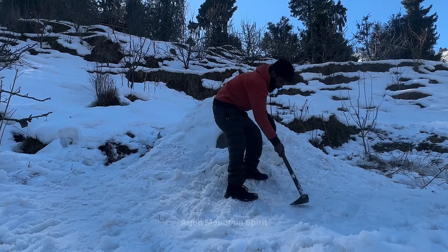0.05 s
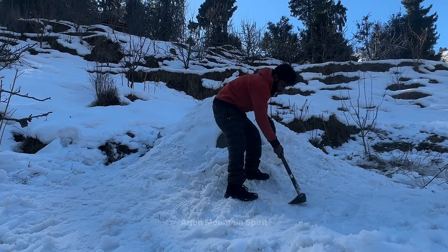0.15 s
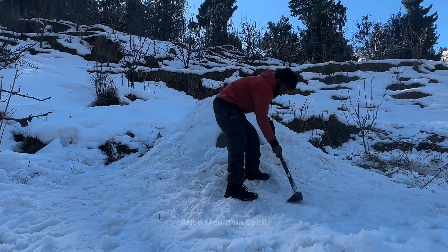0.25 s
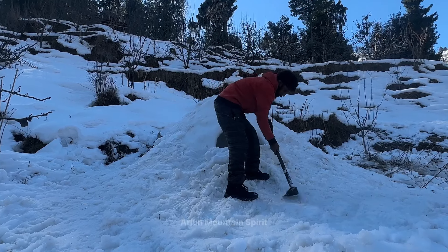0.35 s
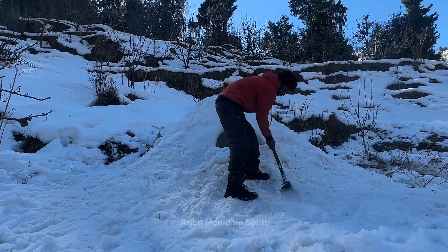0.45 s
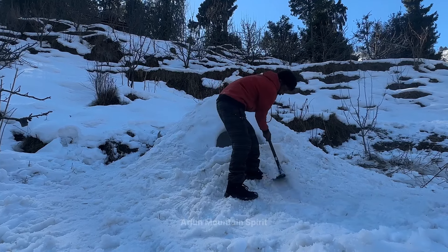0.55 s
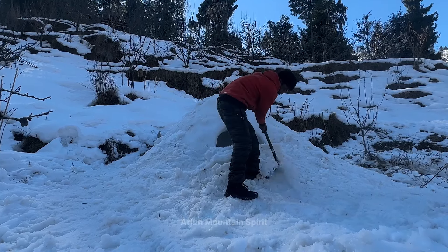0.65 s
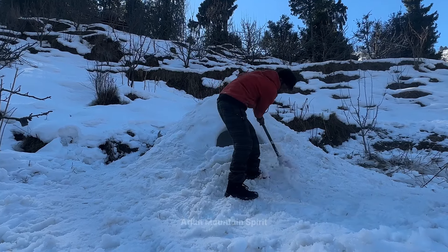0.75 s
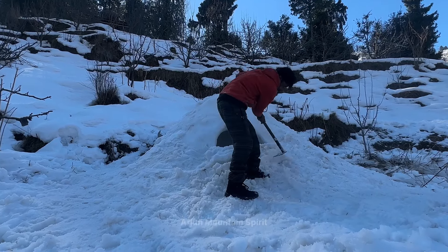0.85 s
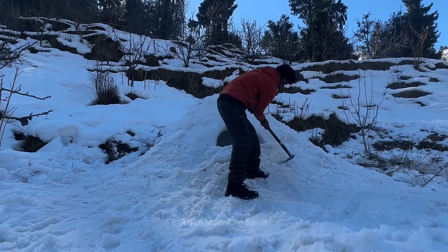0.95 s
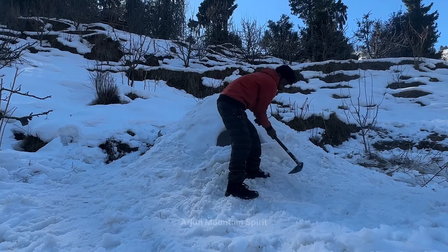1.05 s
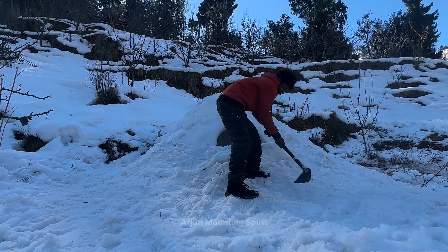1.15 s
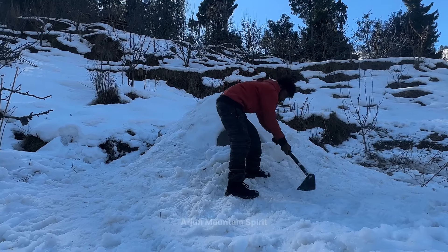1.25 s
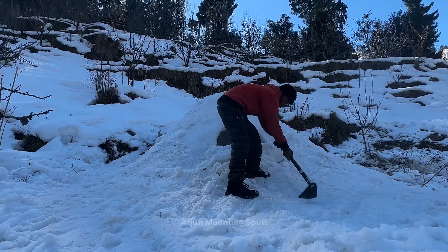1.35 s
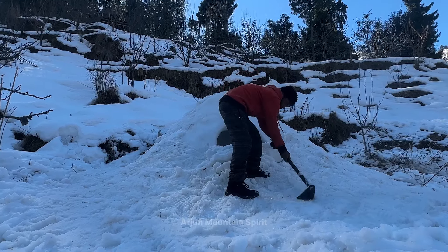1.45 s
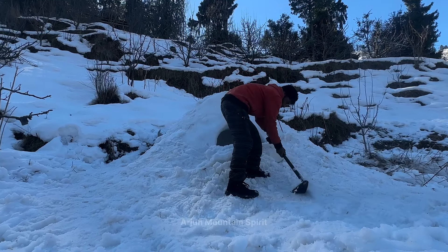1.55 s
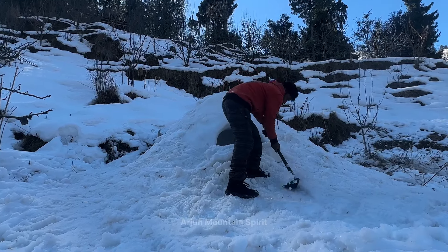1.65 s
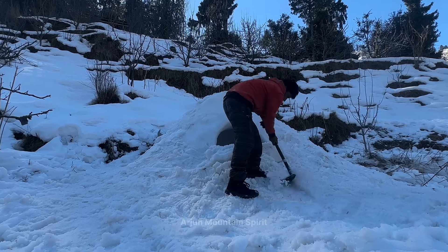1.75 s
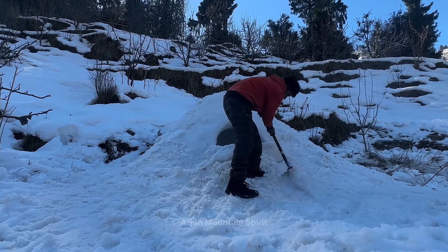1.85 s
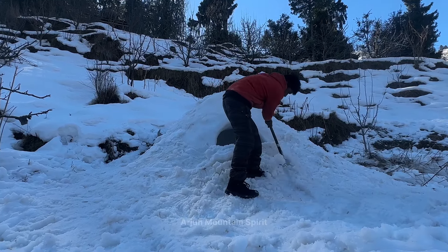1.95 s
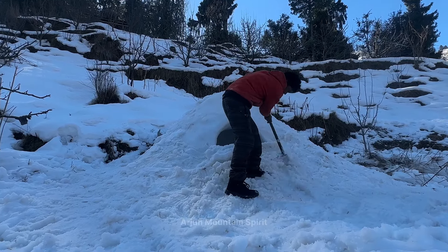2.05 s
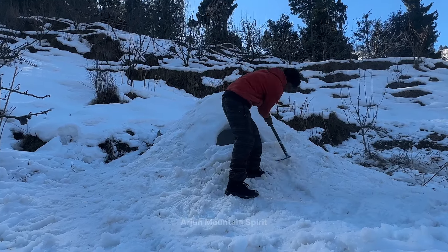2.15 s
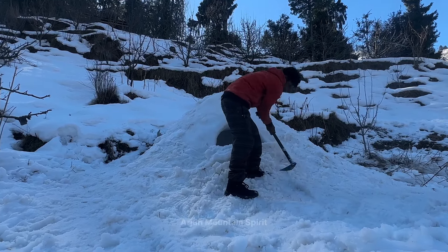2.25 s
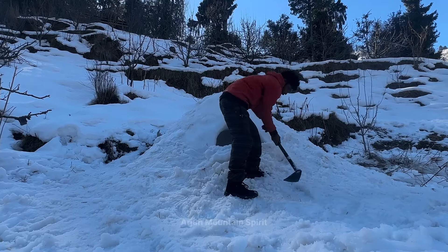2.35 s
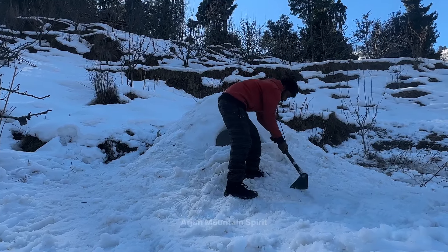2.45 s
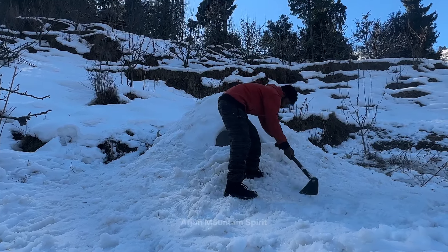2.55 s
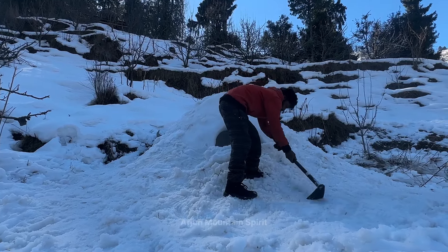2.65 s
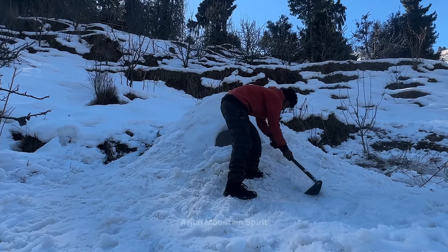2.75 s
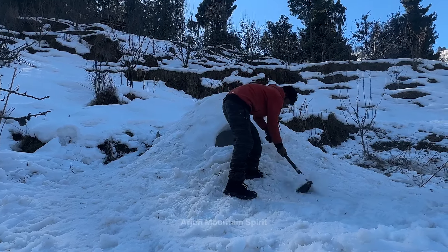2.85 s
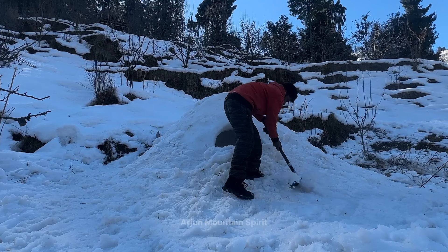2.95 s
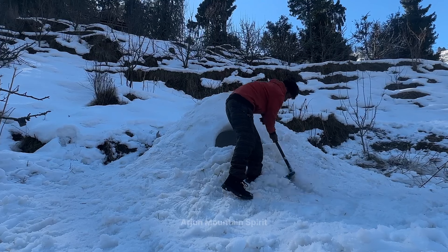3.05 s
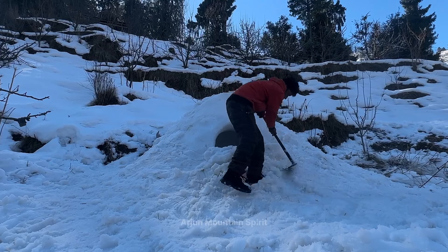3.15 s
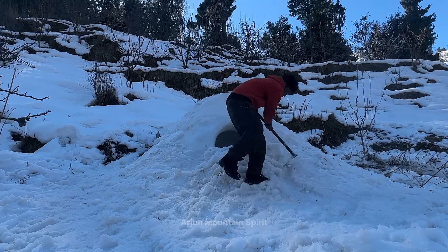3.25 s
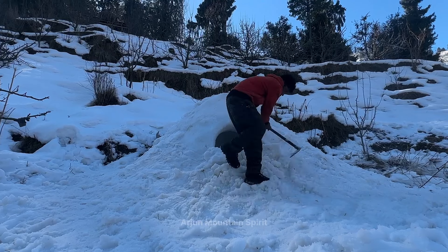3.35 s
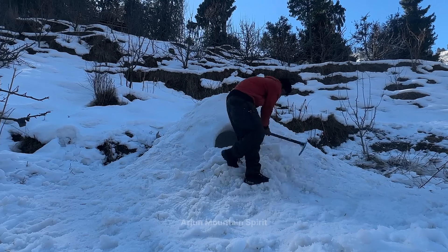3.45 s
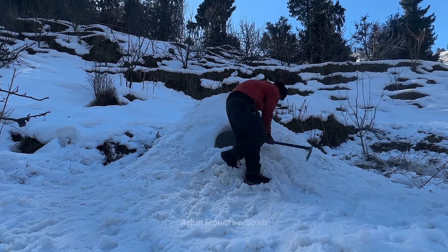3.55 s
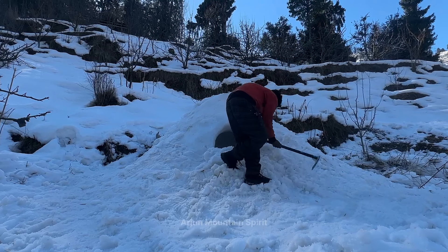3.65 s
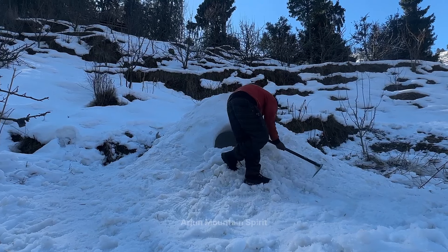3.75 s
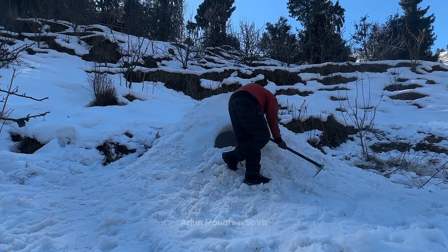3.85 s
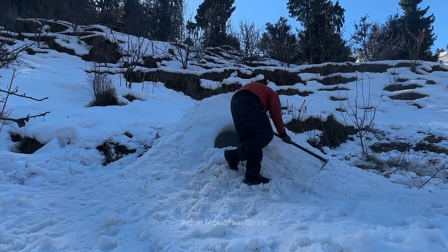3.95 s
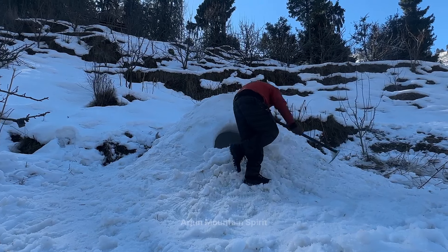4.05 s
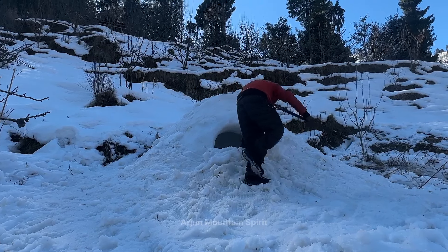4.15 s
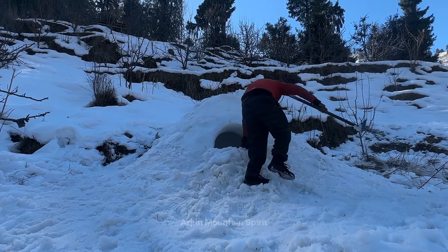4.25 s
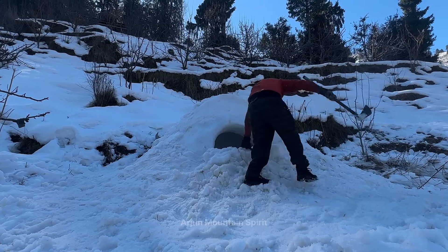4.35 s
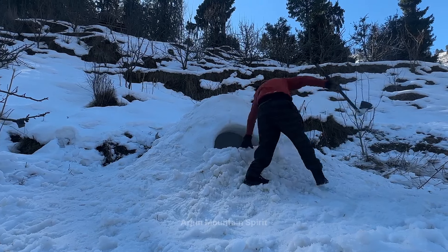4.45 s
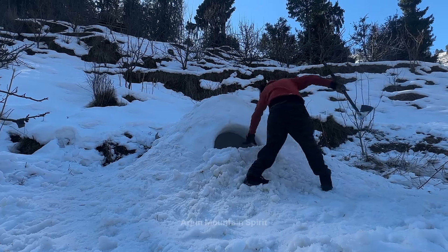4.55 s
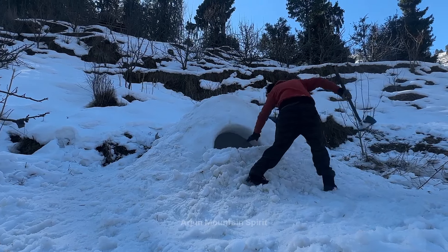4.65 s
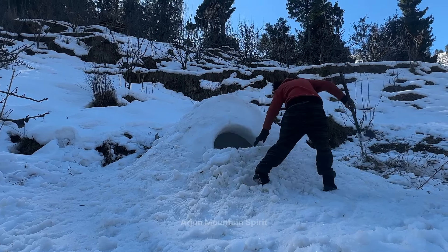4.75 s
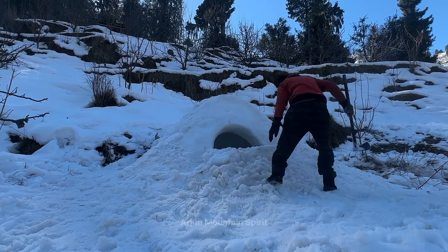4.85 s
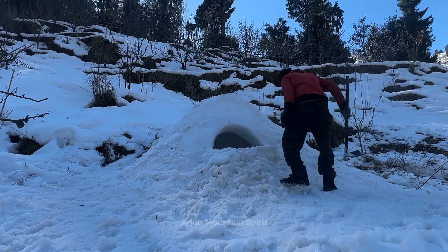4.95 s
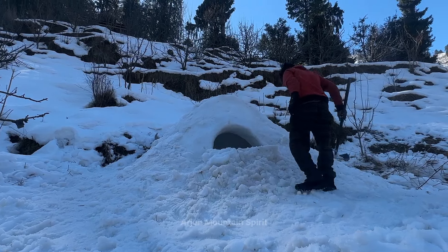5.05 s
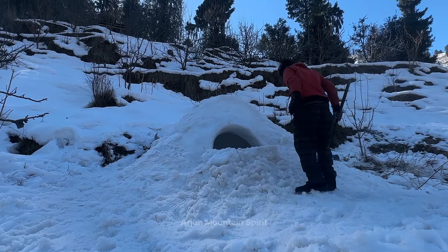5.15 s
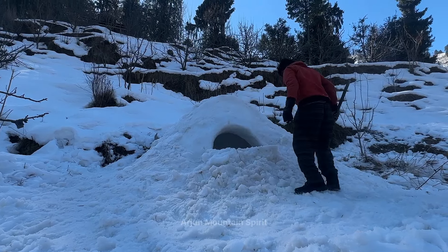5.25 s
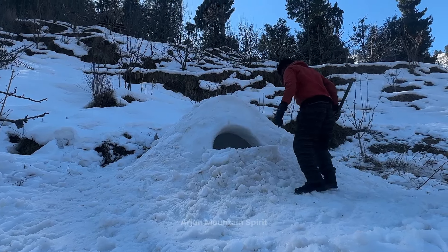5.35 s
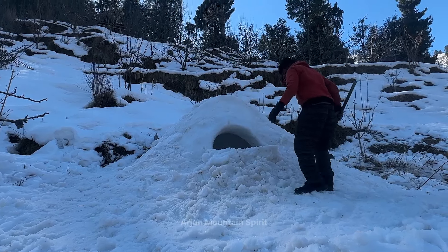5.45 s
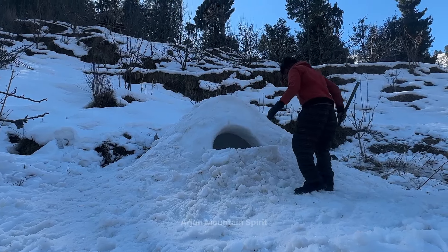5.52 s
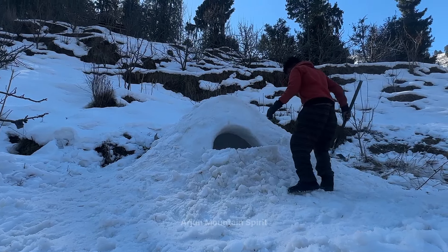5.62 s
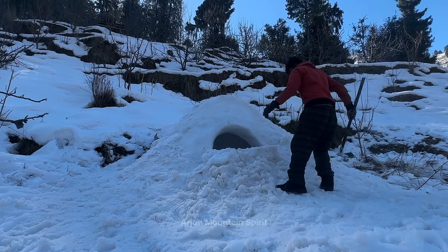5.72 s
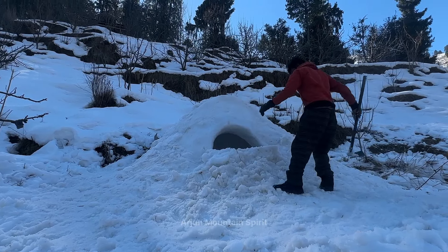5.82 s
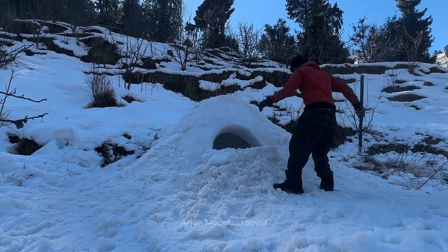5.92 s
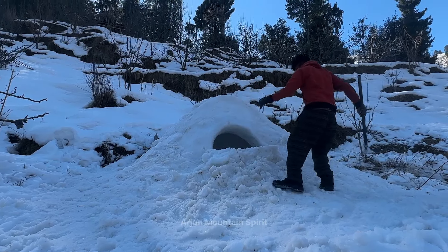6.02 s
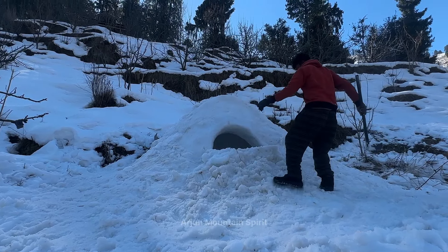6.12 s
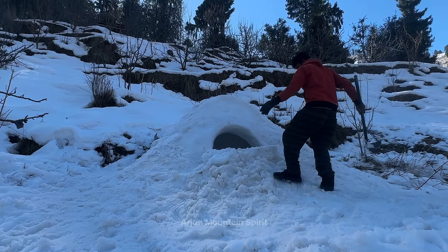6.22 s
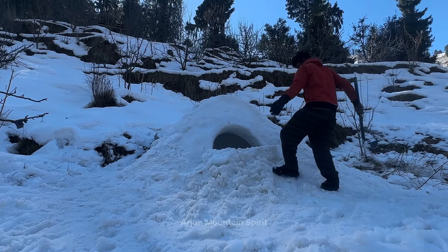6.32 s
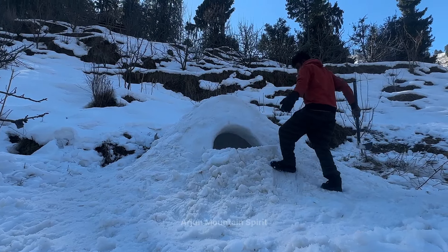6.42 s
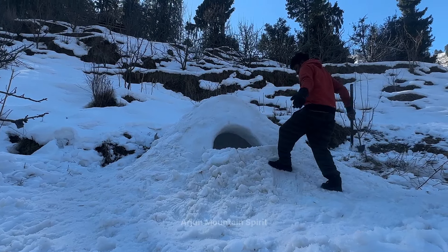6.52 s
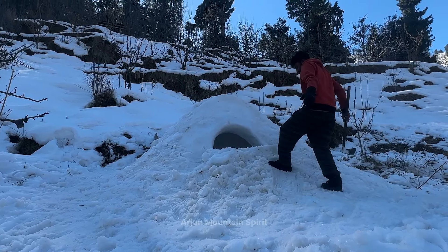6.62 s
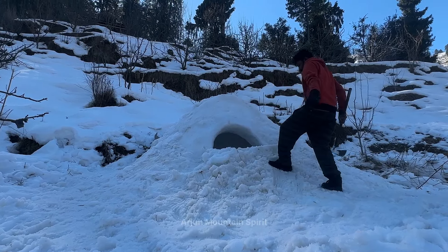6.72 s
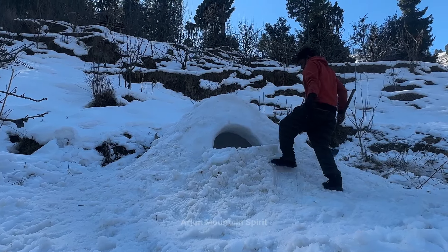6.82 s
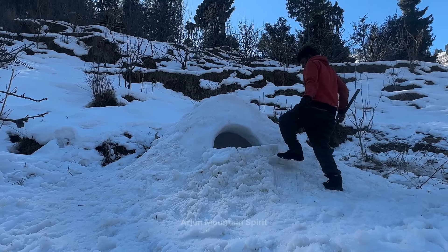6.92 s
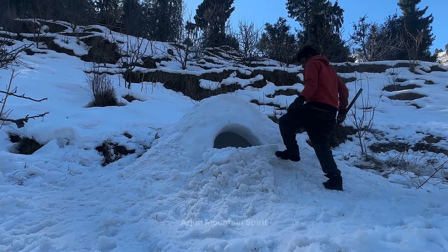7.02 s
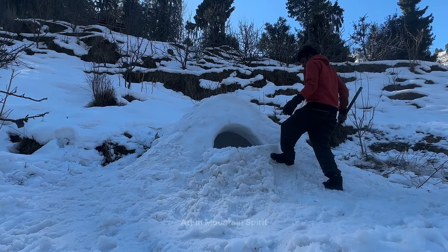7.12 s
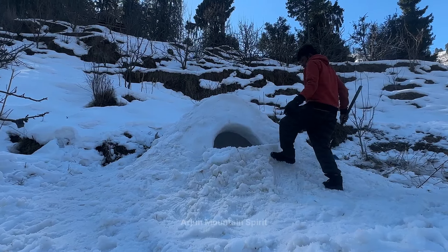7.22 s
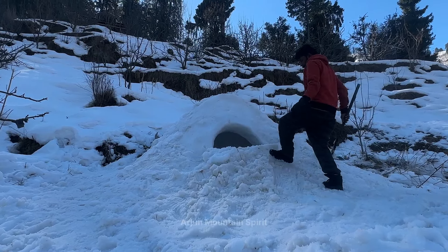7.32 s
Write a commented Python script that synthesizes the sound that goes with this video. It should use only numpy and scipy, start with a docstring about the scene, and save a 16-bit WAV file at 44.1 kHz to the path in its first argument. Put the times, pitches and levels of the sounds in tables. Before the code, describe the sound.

Three loud, coarse scrapes of a metal blade in frozen snow, each breaking into shoves with crisp snaps, dull clods and a slight ringing edge. Fine snow trickles down in the gaps. Around the middle the digging stops; the lifted blade ticks once, then irregular boot steps crunch with soft thuds and grit until the end. Dry outdoor sound, a few metres from a phone microphone, with a very low hush.

```python
"""First a faint press of a boot, then a short steel shovel drags through crusted snow three times,
the first time in two bites. On an open hillside, a few metres from a phone with two microphone ports,
bursts of tiny breaks make sheared crystals, cracking crust and tumbling lumps; resonances ring the loaded blade.
Shaped noise trickles as loose crumbs, and decaying modes clink the lifted blade once.
Then boots crunch and slide on packed snow, in noise jerks and dull sine blows, under a hush of still air."""
import sys
import numpy as np
from scipy import signal
from scipy.fft import rfft, irfft, next_fast_len
from scipy.io import wavfile
from scipy.ndimage import uniform_filter1d

SR = 44100
rng = np.random.default_rng(int(sys.argv[2]) if len(sys.argv) > 2 else 0)


def master_out(mix):
    """Clip the mix to full scale and print it as 16-bit PCM to the path in sys.argv[1]."""
    frames = np.transpose(np.atleast_2d(mix))
    ceiling = np.clip(frames, -1, 1)
    pcm = np.round(ceiling * 32767).astype(np.int16)
    wavfile.write(sys.argv[1], SR, pcm)


N = 325458
TIME = np.arange(N) / SR
SIZE = next_fast_len(N + SR)
FREQS = np.arange(SIZE // 2 + 1) * SR / SIZE


def undb(db):
    """Decibels to gain."""
    return 10 ** (np.asarray(db) / 20)


def unit(x):
    """Scale to an rms of one."""
    return x / np.sqrt(np.mean(x ** 2))


def over_hz(points):
    """A table of (frequency [Hz], value) joined on a log-frequency axis."""
    hz, value = np.transpose(points)
    return np.interp(np.log(FREQS + 1), np.log(hz), value)


def colour(x, points):
    """Causal minimum-phase filter from (frequency [Hz], level [dB]), falling away beyond its ends.

    White input keeps its power."""
    hz, db = np.transpose(points)
    f = np.linspace(1, SR / 2, 2049)
    skirts = (1 + (hz[0] / f / 1.3) ** 8) * (1 + (f / hz[-1] / 1.3) ** 8)
    level = undb(np.interp(np.log(f), np.log(hz), db))
    gain = unit(level / np.sqrt(skirts) + 1e-3)
    # folding the cepstrum puts all the response after time zero
    cepstrum = irfft(np.log(gain))
    fold = np.r_[1, np.full(2047, 2), 1, np.zeros(2047)]
    response = irfft(np.exp(rfft(cepstrum * fold)))
    filtered = signal.oaconvolve(np.atleast_2d(x), response[None], axes=1)
    return filtered[:, :x.shape[-1]].reshape(x.shape)


def resonate(x, hz, width_hz):
    """One resonance with a gain of one at its centre."""
    return signal.lfilter(*signal.iirpeak(hz, hz / width_hz, fs=SR), x)


def drift(rate):
    """A random level that moves to a new value `rate` times a second."""
    return np.interp(TIME * rate, np.arange(8000), rng.standard_normal(8000))


def fractures(rate, spread_db, rub, clump_db, clump_rate):
    """Tiny breaks of uneven size that come in clumps, over smooth rubbing.

    Rows: direct, scattered left, scattered right."""
    happens = rng.random(N) < rate / SR
    size = undb(spread_db * np.minimum(rng.exponential(size=N), 4)) * happens
    signs = np.sign(rng.random((3, N)) - .5)
    breaks = unit(size) * signs + rub * rng.standard_normal((3, N))
    breaks = breaks * undb(clump_db * drift(clump_rate))
    # even out the random loudness over short stretches (about 27 ms)
    return breaks / np.sqrt(uniform_filter1d(breaks[0] ** 2, size=1200) + 1e-6)


def add(track, s, sound):
    """Mix a sound into a track from time s."""
    start = int(s * SR)
    track[start:start + len(sound)] += sound[:N - start]


def pushes(rows, sag_db_per_s, tail_db, tail_s):
    """Level in dB of pushes that build up, sag while held, let go and leave a faint tail.

    Rows: (time [s], rise [s], hold [s], release [s], level [dB])."""
    power = np.full(N, 1e-12)
    t = TIME[:SR]
    for s, rise_s, hold_s, release_s, db in rows:
        attack = np.minimum(t / max(rise_s, .002), 1)
        held = np.clip(t - rise_s, 0, hold_s)
        after = np.maximum(t - rise_s - hold_s, 0)
        tail = undb(tail_db) * np.exp(-after / tail_s)
        release = np.maximum(np.exp(-after / max(release_s, .002)), tail)
        add(power, s, (attack * undb(db + sag_db_per_s * held) * release) ** 2)
    return 10 * np.log10(power)


# strokes of the shovel; snow heaps up on the blade, then slides off: (bite [s], blade fullest [s],
# lift [s], extra crust [dB], extra lumps [dB], singing of the edge before the mix [dB re crystals])
STROKES = [(0.073, 0.321, 0.42, 1, -5, -9), (0.39, 0.485, 0.7, 4, -0.5, -18),
           (1.402, 1.739, 2, 1.5, -0.5, -4.5), (2.666, 2.918, 3.3, -4, 0, -1)]
# the blade moves in shoves, stalling between them:
# (time [s], rise [s], hold [s], release [s], sheared crystals before the mix [dB])
SHOVES = [(0.078, 0.0082, 0.016, 0.04, -47.5), (0.19, 0.14, 0.024, 0.032, -39),
          (0.41, 0.0086, 0.091, 0.023, -37), (0.52, 0.02, 0.056, 0.057, -44),
          (0.636, 0.01, 0.004, 0.041, -42.5), (1.396, 0.025, 0.35, 0.012, -35),
          (1.8, 0.011, 0.016, 0.018, -38), (1.858, 0.012, 0.055, 0.082, -46),
          (1.988, 0.02, 0.004, 0.018, -45.5), (2.66, 0.013, 0.227, 0.012, -34),
          (2.936, 0.026, 0.037, 0.013, -37), (3.034, 0.006, 0.073, 0.032, -40),
          (3.155, 0.016, 0.044, 0.021, -47)]


def digging():
    """The shoves set the level; the heap adds drag, cracks and lumps and makes the edge sing less. All in dB."""
    bite, fullest, lift, more_crust_db, more_lumps_db, sing_db = np.transpose(STROKES)
    # 0 for an empty blade, 1 for a full one
    heap = sum(np.interp(TIME, times, [0, 1, 0]) for times in zip(bite, fullest, lift))
    stroke = np.maximum(np.searchsorted(bite, TIME) - 1, 0)
    # the tail is loosened snow that runs on
    shove_db = pushes(SHOVES, sag_db_per_s=-9.5, tail_db=-13, tail_s=0.12)
    # a full blade rubs steadily, also between the shoves
    drag = undb(-45) * heap
    cut_db = 20 * np.log10(np.hypot(undb(shove_db), drag))
    # each pair: empty blade, full blade
    crust_db = np.interp(heap, [0, 1], [-9, -1]) + more_crust_db[stroke]
    lump_db = np.interp(heap, [0, 1], [-13, 0]) + more_lumps_db[stroke]
    bright_db = np.interp(heap, [0, 1], [-0.5, -3.5])  # tilt of the blade's ring per octave
    return cut_db, crust_db, lump_db, sing_db[stroke] - 5.5 * heap, bright_db


# colours of the breaking snow, close to the blade: (frequency [Hz], level [dB]); crumbs use the lumps too
CRYSTAL_COLOUR = [(2400, -11.5), (3200, -6), (3900, 2), (5000, -5), (5700, 4), (6800, -4), (8700, -1.5),
                  (9800, 0.5), (11300, -24), (15000, -5)]
CRUST_COLOUR = [(700, -8.5), (1080, -6), (1300, -4.5), (1700, -4.5), (2250, 9), (2600, -4), (3200, -0.5),
                (4500, -18)]
LUMP_COLOUR = [(35, -26.5), (55, -11.5), (90, -6), (200, 0), (360, -2.5), (500, -12.5), (640, 0), (820, -1),
               (980, -13.5), (2000, -18)]


def shovel(cut_db, crust_db, lump_db, sing_db, bright_db):
    """The edge shears crystals and cracks the crust; lumps tumble ahead of the blade."""
    shear = fractures(rate=4000, spread_db=0.5, rub=0.3, clump_db=1.5, clump_rate=130)
    cracks = fractures(rate=1600, spread_db=0.5, rub=0.64, clump_db=5.5, clump_rate=98)
    tumbles = fractures(rate=800, spread_db=1.0, rub=0.6, clump_db=6.0, clump_rate=80)
    snow = undb(-2.5) * colour(shear * undb(cut_db), CRYSTAL_COLOUR)
    snow = snow + undb(-2.0) * colour(cracks * undb(cut_db + crust_db), CRUST_COLOUR)
    snow = snow + undb(-0.5) * colour(tumbles * undb(cut_db + lump_db), LUMP_COLOUR)
    return snow + blade(cut_db, crust_db, sing_db, bright_db, wander_db=2.0, wander_rate=16)


# resonances of the blade while snow loads it: (frequency [Hz], width [Hz], level before the mix [dB])
LOADED_BLADE = [(1127, 70, -5.5), (1672, 100, -2), (2223, 91, 1), (2930, 110, -1), (3500, 110, 1.5),
                (3870, 316, 1), (4635, 130, 1), (5580, 200, -4.5), (5840, 150, 4.5), (7490, 250, 2),
                (8050, 99, -1), (9500, 260, -4.5), (9600, 260, -10.5)]


def blade(cut_db, crust_db, sing_db, bright_db, wander_db, wander_rate):
    """The edge rings the blade; as the contact shifts, each resonance swells and fades on its own."""
    # it rings only while it is pressed into the snow
    pressed = np.clip((cut_db + 68.5) / 16, 0, 1)
    force = fractures(rate=2000, spread_db=3.0, rub=0.36, clump_db=-0.5, clump_rate=200)
    force = force * undb(cut_db) * pressed
    # coarse cracks shake the whole plate harder than fine shearing does
    shaking = force * undb(0.23 * crust_db)
    body = 0
    for k, (hz, width_hz, db) in enumerate(LOADED_BLADE):
        tilt_db = bright_db * np.log2(hz / 4000)
        swell = undb(db + tilt_db + wander_db * drift(wander_rate))
        body = body + (-1) ** k * resonate(shaking, hz, width_hz) * swell
    singing = resonate(force * undb(sing_db), hz=5370, width_hz=137)
    return undb(9.5) * body + undb(22.0) * singing


# the largest pieces of crust, which give way at once: (time [s], level before the mix [dB], decay [s])
SNAPS = [(0.087, -27.5, 0.023), (0.145, -32, 0.008), (0.2334, -27.5, 0.016), (0.333, -18, 0.012),
         (0.4221, -19.5, 0.012), (0.4304, -16, 0.012), (0.4944, -25, 0.0094), (0.5467, -20.5, 0.018),
         (0.644, -25.5, 0.012), (1.4135, -17.5, 0.018), (1.478, -21.5, 0.021), (1.52, -20.5, 0.018),
         (1.6064, -18, 0.011), (1.6894, -22, 0.017), (1.8083, -28.5, 0.015), (1.8647, -31, 0.01),
         (2.0033, -27, 0.014), (2.6674, -25.5, 0.017), (2.8514, -23.5, 0.012), (2.9484, -27, 0.01),
         (3.039, -19.5, 0.0096), (3.169, -25, 0.014), (3.8294, -55, 0.015), (4.564, -46, 0.014),
         (5.1034, -44, 0.015), (6.0744, -39, 0.014), (7.054, -42, 0.015)]


def snap_envelope(rise_s):
    """Each piece of crust lets go with a burst that dies away quickly."""
    out = np.zeros(N)
    t = TIME[:SR // 4]
    for s, db, decay_s in SNAPS:
        add(out, s, undb(db) * (1 - np.exp(-t / rise_s)) * np.exp(-t / decay_s))
    return out


def snaps():
    """Showers of crystals from the breaking crust, each a short burst of fractures."""
    shower = fractures(rate=3000, spread_db=3.0, rub=0.44, clump_db=2.5, clump_rate=640)
    shower_colour = [(900, -2), (2200, -3), (3800, 7), (5600, 0), (9500, -12.5), (11500, -29.0), (15000, -27.0)]
    return undb(-13.0) * colour(shower * snap_envelope(rise_s=0.0031), shower_colour)


def chips(count, low_hz, high_hz, cycles, spread_db):
    """Hard flakes break off one by one; each rings for a few cycles at a pitch set by its size."""
    out = np.zeros(N)
    t = TIME[:SR // 50]
    for when, smallness, luck in rng.random((count, 3)):
        hz = low_hz * (high_hz / low_hz) ** smallness
        strength = undb(spread_db * min(-np.log(luck), 3))
        ring = np.sin(2 * np.pi * hz * t) * np.exp(-hz * t / cycles)
        add(out, when * TIME[-1], strength * np.sqrt(hz) * ring)
    return unit(out)


def flakes(cracking_db, grit_db):
    """The blade and the boots knock flakes from the frozen crust, louder the harder they work."""
    work = undb(-7.5) * undb(cracking_db) + undb(-8.5) * undb(grit_db)
    return work * chips(count=1900, low_hz=1406, high_hz=5160, cycles=11, spread_db=4.0)


# dull blows of clods and heels on the ground: (time [s], level before the mix [dB], pitch [Hz])
THUDS = [(0.459, -29.5, 199), (0.489, -27, 220), (0.908, -50, 238), (1.61, -26, 201), (1.719, -27, 244),
         (1.755, -24.5, 326), (2.21, -60, 330), (2.434, -54, 344), (2.8, -29.5, 201), (2.872, -26, 178),
         (2.982, -31, 139), (3.373, -43, 132), (3.6, -49, 210), (4.562, -38.5, 334), (5.057, -42, 343),
         (5.101, -35.5, 189), (5.413, -38, 407), (5.68, -48, 350), (5.842, -48.5, 148), (6.075, -41, 175),
         (6.302, -32.5, 229), (6.353, -36, 290), (7.063, -38.5, 340)]


def thuds(cycles, boom_hz, boom_s):
    """Snow swallows a blow within a cycle or two; the deep pack under it gives a short boom."""
    mound_left_s, trodden_boom_db = 5.3, -7  # from then on the boots tread thin snow, which booms less
    knocks, booms = np.zeros((2, N))
    t = TIME[:SR // 5]
    for s, db, hz in THUDS:
        # higher blows stir the pack less, by 6 dB per octave
        boom_db = db - 13.5 - 6 * np.log2(hz / boom_hz) + trodden_boom_db * (s > mound_left_s)
        add(knocks, s, undb(db) * np.sin(2 * np.pi * hz * t) * np.exp(-hz * t / cycles))
        add(booms, s, undb(boom_db) * np.sin(2 * np.pi * boom_hz * t) * np.exp(-t / boom_s))
    knock_colour = [(50, -5), (200, 1.5), (500, 5.0), (750, 2), (1200, -9.5)]
    return undb(-15.0) * colour(knocks, knock_colour) + undb(4.0) * booms


# boots press on packed snow, heel and sole apart:
# (time [s], rise [s], hold [s], packing before the mix [dB], surface grit [dB re packing, before the mix])
STEPS = [(0.0, 0.011, 0.071, -60, -9), (0.076, 0.017, 0.14, -55, -12), (3.328, 0.11, 0.036, -54, 1.5),
         (3.548, 0.037, 0.036, -62, 1), (3.717, 0.016, 0.009, -66.5, -9), (3.814, 0.01, 0.011, -70.5, 3.5),
         (3.877, 0.038, 0.06, -67.5, 4), (4.492, 0.014, 0.041, -55.5, -6.5),
         (4.555, 0.012, 0.06, -48.5, -8.5), (4.679, 0.018, 0.12, -63, -3),
         (5.046, 0.0086, 0.076, -51, -2.5), (5.162, 0.02, 0.037, -55, -7), (5.326, 0.05, 0.021, -62, -8),
         (5.406, 0.006, 0.015, -51, -11.5), (5.553, 0.053, 0.0095, -59.5, -2), (5.638, 0.041, 0.1, -58, -3),
         (5.93, 0.06, 0.08, -55.5, 0), (6.059, 0.016, 0.12, -52, -0.5), (6.2, 0.02, 0.066, -57, -2.5),
         (6.291, 0.017, 0.073, -48.5, -6.5), (6.4, 0.0096, 0.13, -53, -6),
         (6.704, 0.033, 0.048, -73.5, -1.5), (7.046, 0.02, 0.02, -48, -1.5),
         (7.095, 0.015, 0.033, -55.5, -3.5), (7.351, 0.027, 0.03, -45, -1.5)]


def treading():
    """Levels in dB of the packing under the soles and of the grit on top."""
    release_s = 0.024
    # the tail is snow that settles under the sole
    shape = dict(sag_db_per_s=-5, tail_db=-22.5, tail_s=0.081)
    packing = [(s, rise, hold, release_s, db) for s, rise, hold, db, _ in STEPS]
    grit = [(s, rise, hold, release_s, db + grit_db) for s, rise, hold, db, grit_db in STEPS]
    return pushes(packing, **shape), pushes(grit, **shape)


# colours of the snow packing under the sole and of the grit on top: (frequency [Hz], level [dB])
PACKING_COLOUR = [(35, -16.5), (60, -7.5), (120, -4.5), (220, -1), (370, -1), (500, -8), (660, -1.5),
                  (820, -4), (1000, -21), (1600, -12), (2800, -36)]
GRIT_COLOUR = [(1200, 1), (1650, -14), (2300, 1.5), (2750, -3), (4300, 1), (5100, -2), (5700, 1),
               (6700, -2.5), (7600, -2), (9300, 4), (11300, -21), (15000, -5)]


def boots(weight_db, grit_db):
    """Packed snow collapses in small jerks under a sole while loose grit crackles on top."""
    jerks = fractures(rate=700, spread_db=1.0, rub=0.87, clump_db=4.0, clump_rate=64) * undb(weight_db)
    grit = fractures(rate=2200, spread_db=0.0, rub=1.0, clump_db=3, clump_rate=39) * undb(grit_db)
    return colour(jerks, PACKING_COLOUR) + undb(2.5) * colour(grit, GRIT_COLOUR)


# modes of the steel blade in free air: (frequency [Hz], level re the clink [dB], time to fall 60 dB [s])
FREE_BLADE = [(2093, -18.5, 0.24), (2055, -25.5, 0.6), (5700, -23, 0.34), (5762, -2.5, 0.19),
              (5880, 0, 0.19), (7360, -6, .02), (8600, 0, .015), (11400, 0, 0.019)]


def clink(tick_db, tick_s):
    """A hard tap on the free blade: close pairs of modes beat as they fade."""
    clink_s, clink_db = 4.1888, -37.5
    out = np.zeros(N)
    t = TIME[:SR]
    ring = sum(undb(db - 60 * t / t60) * np.sin(2 * np.pi * hz * t) for hz, db, t60 in FREE_BLADE)
    tick_colour = [(2000, -11.5), (5000, -9), (7400, 5), (10000, -5), (15000, -7)]
    tick = colour(np.exp(-t / tick_s) * rng.standard_normal(SR), tick_colour)
    # the contact lasts a fraction of a millisecond
    contact = 1 - np.exp(-t / 0.00018)
    add(out, clink_s, undb(clink_db) * (ring + undb(tick_db) * tick) * contact)
    return out


# spills of loose crumbs down the mound: (time [s], length [s], level before the mix [dB])
SPILLS = [(0.696, 0.13, -56), (0.927, 0.16, -67), (1.226, 0.093, -70), (2.037, 0.064, -60),
          (2.172, 0.14, -69), (2.302, 0.0085, -59.5), (2.419, 0.02, -69.5), (2.544, 0.1, -72.5),
          (3.225, 0.22, -61), (3.554, 0.28, -68), (3.918, 0.078, -64), (4.065, 0.15, -67.5),
          (4.383, 0.029, -70.5), (4.438, 0.04, -71), (4.73, 0.3, -67)]


def crumbs():
    """Loose crystals trickle down the mound with a few small lumps among them."""
    # a long spill starts and stops slowly: rise and release are shares of its length
    rows = [(s, 0.23 * length, length, 0.65 * length, db) for s, length, db in SPILLS]
    flow = undb(pushes(rows, sag_db_per_s=-4.5, tail_db=-19, tail_s=0.14))
    fine = fractures(rate=830, spread_db=0.0, rub=0.66, clump_db=2, clump_rate=57)
    coarse = fractures(rate=350, spread_db=3.0, rub=0.37, clump_db=5, clump_rate=74)
    fine_colour = [(1000, -14), (2300, -7.5), (2900, -4.5), (4000, -0.5), (5600, -1.5), (6800, -3.5),
                   (8300, 2.5), (9800, 0.5), (11300, -22), (15000, -4)]
    hiss = colour(fine, fine_colour)
    return flow * (undb(3.0) * hiss + undb(-16) * colour(coarse, LUMP_COLOUR))


# colour of the still mountain air around the phone: (frequency [Hz], level [dB])
AIR_COLOUR = [(32, -13.5), (55, -1.5), (85, 0), (150, -14.5), (400, -13.5), (700, -19.5), (1100, -23.5),
              (2500, -29), (6500, -29), (9500, -22.5), (11500, -43.5), (15000, -35)]


def air():
    """A faint, slowly wavering noise hush, partly shared by both sides."""
    noise = rng.standard_normal((3, N))
    # a new level three times a second
    waver = undb(np.interp(TIME * 3, np.arange(N), rng.standard_normal(N)))
    hush = unit(colour(noise[0] + 2.0 * noise[1:], AIR_COLOUR))
    return undb(-71) * hush * waver


# the phone's two microphone ports: (frequency [Hz], phase by which the left leads [rad])
PORT_PHASE = [(100, 0), (900, 0.45), (1300, -2.5), (1750, 1), (2300, -0.26), (2750, -2), (3400, -2),
              (3900, 1), (5500, 0.5), (6800, 2.5), (7400, 8), (8500, 3), (9700, 4.5), (11800, 9.5),
              (13300, 0.5)]
# and (frequency [Hz], left minus right [dB])
PORT_BALANCE = [(200, -2), (800, -1.5), (1130, 7.5), (1600, -4.5), (2250, 2.1), (3400, -4), (4400, -9),
                (5500, -3.5), (7500, 0.5), (9000, -8.5), (11500, 0.5), (14000, -0.5)]
# sound that arrives scattered by the slope: (frequency [Hz], level re direct [dB])
SCATTER = [(100, -31), (700, -17), (1200, 0), (4000, -5.5), (5600, -12), (8000, -0.5), (10500, -14),
           (14000, -19)]


def ports(direct, scattered):
    """Direct sound meets each port with its own phase and level; scattered sound is unrelated between them."""
    side = np.array([[1], [-1]])
    share = undb(over_hz(SCATTER))
    arrival = rfft(direct, SIZE) * np.exp(.5j * side * over_hz(PORT_PHASE))
    both = (arrival + share * rfft(scattered, SIZE)) / np.sqrt(1 + share ** 2)
    tilt = undb(side * over_hz(PORT_BALANCE) / 2)
    # the two ports together keep their power
    balance = tilt / np.sqrt(np.mean(tilt ** 2, axis=0))
    return irfft(both * balance, SIZE)[:, :N]


def scene():
    """Shovel and boots a few metres off in the open, with no walls to ring."""
    cut_db, crust_db, lump_db, sing_db, bright_db = digging()
    weight_db, grit_db = treading()
    snow = shovel(cut_db, crust_db, lump_db, sing_db, bright_db)
    snow = snow + snaps() + boots(weight_db, grit_db) + crumbs()
    blows = flakes(cut_db + crust_db, grit_db)
    blows = blows + thuds(cycles=1.35, boom_hz=88.4, boom_s=0.034)
    blows = blows + clink(tick_db=0, tick_s=0.0051)
    return ports(snow[0] + blows, snow[1:]) + air()


def record(dry):
    """The phone cuts the top, steeply above 15.8 kHz."""
    low_pass = signal.ellip(10, .1, 60, 15800, fs=SR, output="sos")
    return signal.sosfiltfilt(low_pass, dry)


dry = scene()
out = record(dry)
master_out(out)
```